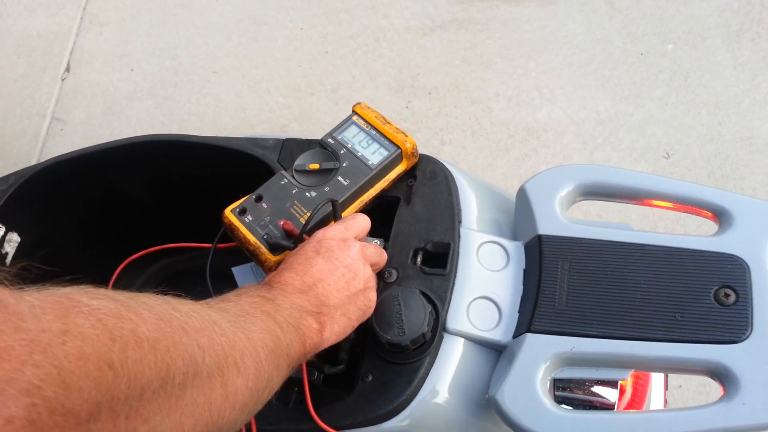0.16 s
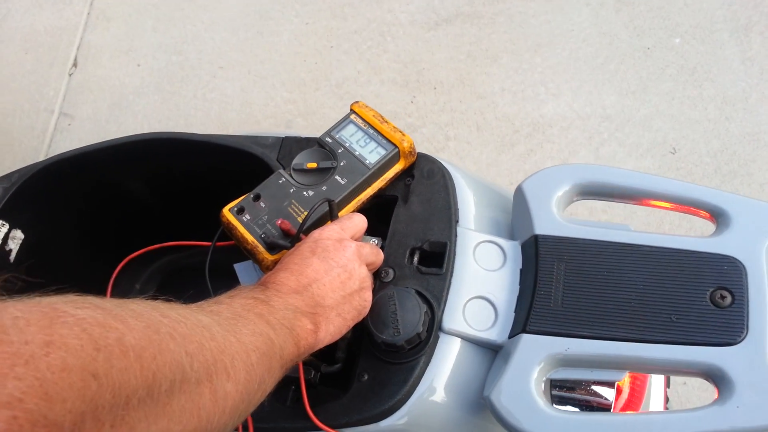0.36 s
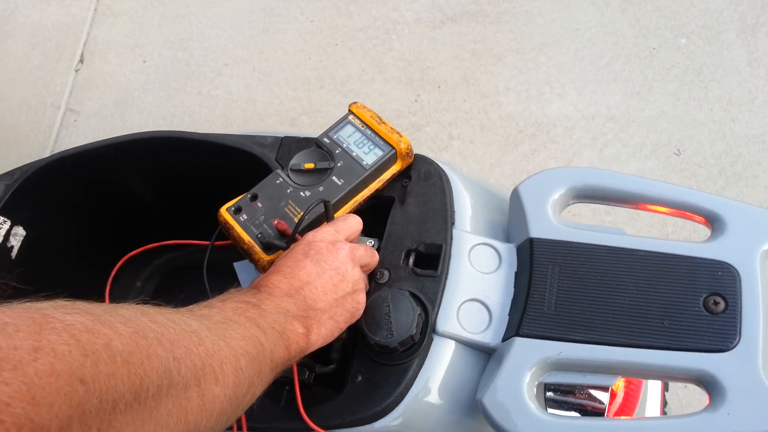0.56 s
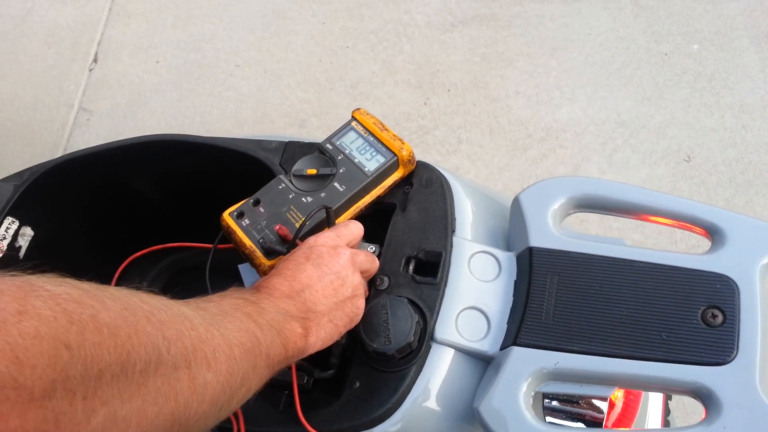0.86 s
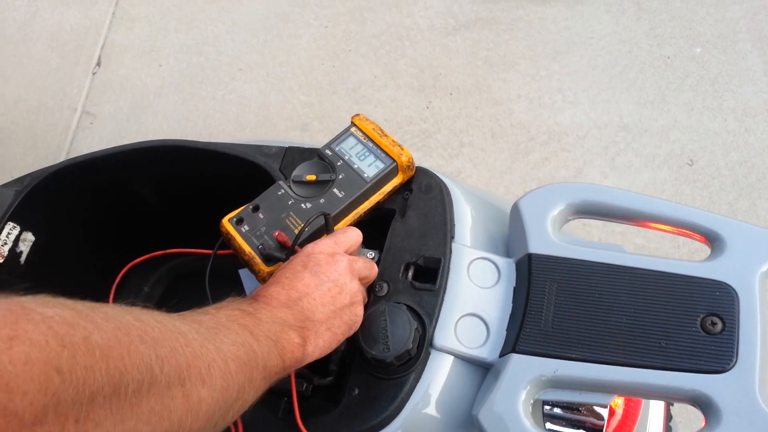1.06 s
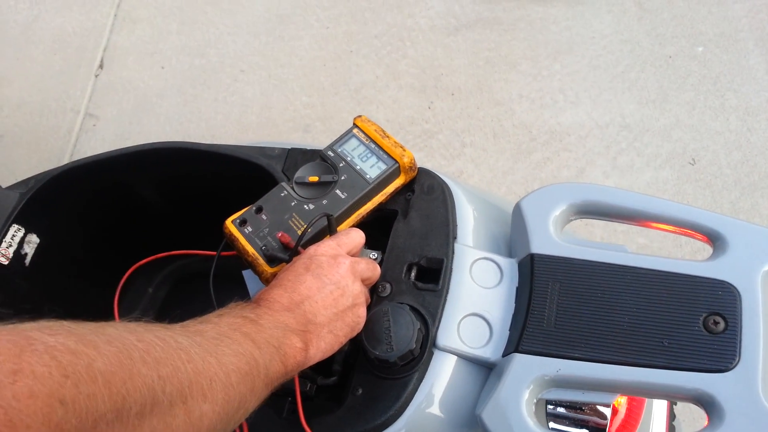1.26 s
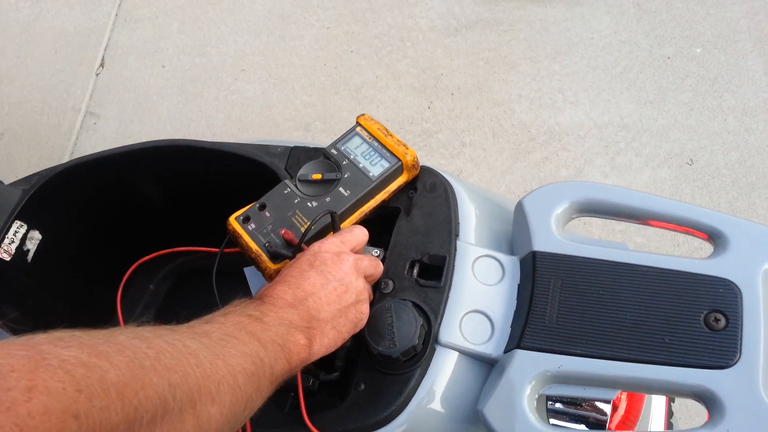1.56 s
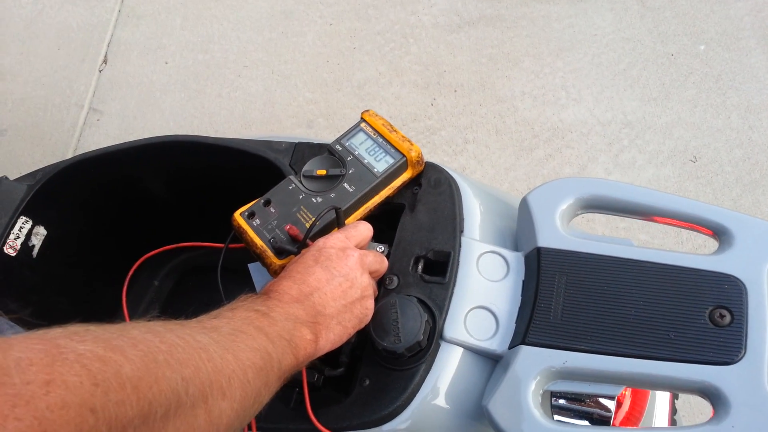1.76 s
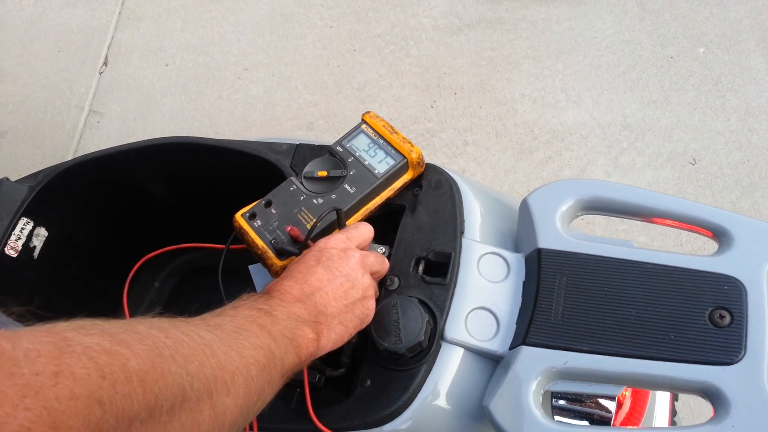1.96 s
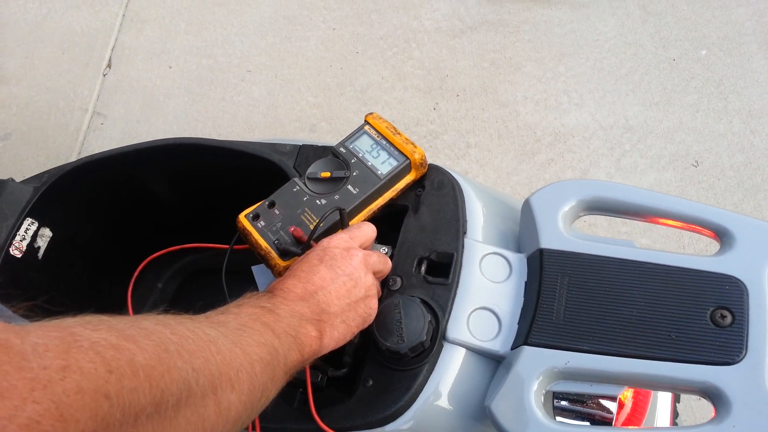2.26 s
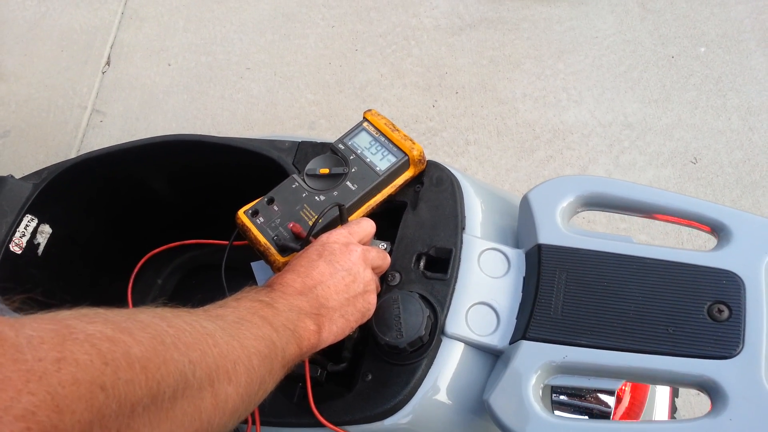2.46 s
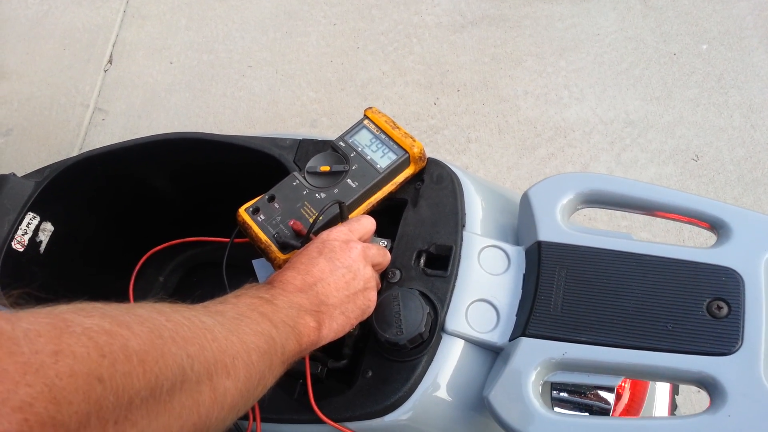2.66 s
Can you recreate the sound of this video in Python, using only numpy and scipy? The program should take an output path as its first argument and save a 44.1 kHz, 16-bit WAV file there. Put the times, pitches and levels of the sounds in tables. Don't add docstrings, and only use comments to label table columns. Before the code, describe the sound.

Scooter engine starting: quiet handling taps, a relay click, rough gear clatter, then a quick puttering idle

```python
import sys
import numpy as np
from scipy import signal
from scipy.io import wavfile
from scipy.ndimage import uniform_filter1d, minimum_filter1d

SR = 44100
rng = np.random.default_rng(int(sys.argv[2]) if len(sys.argv) > 2 else 0)


def how_loud(loudness_db):
    steps = np.asarray(loudness_db, float) / 20
    return 10 ** steps


def put_to_file(sound):
    columns = np.atleast_2d(sound).T
    safe = np.clip(columns, -1, 1)
    whole_steps = np.round(safe * 32767)
    wavfile.write(sys.argv[1], SR, whole_steps.astype(np.int16))


N = 123479
T = np.arange(N) / SR

# t/s, clatter level/dB, fizz against it/dB, low panel against it/dB
DRIVE = [(1.565, -55, -8, -6), (1.59, -33.5, -6, -11), (1.611, -22.5, -2.5, 6), (1.64, -21.5, 0, -4),
         (1.67, -16, -1, 3.5), (1.714, -16, -11, 0.5), (1.75, -23.5, 2, -8), (1.79, -22.5, -0.5, -35),
         (1.823, -20, 2.5, -2.5), (1.87, -19, 2.5, 2.5), (1.92, -17.5, 6, 0.5), (1.96, -19, 1, 0.5),
         (2.05, -19.5, 2.5, -2), (2.25, -16.5, 4, -4.5), (2.5, -20.5, 4, -6), (2.72, -22, 5.5, -0.5),
         (2.8, -24.5, 3, -6)]
MIC_CUT_HZ = 85
STARTER_CUT_HZ, FRAME_CUT_HZ = 150, 340


def evened(x):
    return x / np.sqrt(np.mean(x ** 2) + 1e-20)


def read(points, hz):
    f, value = np.transpose(points)
    return np.interp(np.log(hz + 1), np.log(f + 1), value)


def add(mix, s, sound):
    at = round(s * SR)
    part = mix[max(at, 0):][:len(sound) + min(at, 0)]
    part += sound[max(-at, 0):][:len(part)]


def high_pass(x, hz, order):
    return signal.sosfilt(signal.butter(order, hz, "high", fs=SR, output="sos"), x)


def colour(x, points, rings=(), ring_db=0):
    hz = abs(np.fft.fftfreq(8192, 1 / SR))
    power = how_loud(read(points, hz)) ** 2 if points else 1e-8 + 0 * hz
    for f, width, db in rings:
        power = power + how_loud(db + ring_db) ** 2 / (1 + (2 * (hz - f) / width) ** 2) ** 2
    response = np.exp(np.conj(signal.hilbert(np.log(power) / 2)))
    taps = np.fft.ifft(response).real[:4096]
    return signal.oaconvolve(x, taps)[:len(x)]


def teeth(per_s=2500, spread_db=1.5):
    size = how_loud(spread_db * np.minimum(rng.exponential(1, N), 4))
    size = size * (rng.random(N) < per_s / SR)
    return evened(size * rng.choice([-1., 1.], N)) + 0.83 * rng.standard_normal(N)


def burst(t60, rise_s, length=.3):
    t = np.arange(0, length, 1 / SR)
    return np.minimum(t / rise_s, 1) * how_loud(-60 * t / t60)


def yard():
    # f/Hz, level/dB per Hz
    air = [(60, -47), (120, -11.5), (260, -9.5), (500, -10.5), (2000, -20), (6300, -30), (11000, -29.5),
           (14400, -29.5)]
    # f/Hz, left-right likeness
    likeness = [(60, 1), (370, 0.5), (2270, -0.13), (14000, 0.0)]
    air_db, hum_db = -54.5, -62.5
    frames, hz = N // 256 + 5, np.fft.rfftfreq(1024, 1 / SR)
    a, b, c, d, patches = rng.standard_normal((frames, 513, 5)).T
    patches = evened(uniform_filter1d(uniform_filter1d(patches, 10, 0), 10, 1))
    same, left = read(likeness, hz)[:, None], a + 1j * b
    right = same * left + np.sqrt(1 - same ** 2) * (c + 1j * d)
    lumps_db = 2.7 * patches / (1 + hz[:, None] / 3000)
    z = np.array([left, right]) * how_loud(read(air, hz)[:, None] + lumps_db)
    hiss = evened(signal.istft(z, nperseg=1024, noverlap=768)[1][:, :N])
    hum = evened(colour(rng.standard_normal(N), (), [(258, 18, 0)]))
    return how_loud(air_db) * hiss + how_loud(hum_db) * hum


def cricket():
    # t/s, length/s, level/dB
    chirps = [
        (-.02, .06, -66),
        (1.406, 0.043, -67),
        (1.461, 0.073, -66),
    ]
    tone_hz, throb_hz = 4350, 40
    out = np.zeros(N)
    for at, length, db in chirps:
        t = np.arange(0, length, 1 / SR)
        throb = 1 + 0.6 * np.sin(2 * np.pi * throb_hz * t)
        swell = np.sqrt(np.sin(np.pi * t / length))
        add(out, at, how_loud(db) * swell * throb * np.sin(2 * np.pi * tone_hz * t))
    return out


def touches():
    # t/s, peak level/dB, f/Hz, width/Hz, t60/s
    taps = [(0.0862, -41.5, 3300, 5000, 0.045), (.086, -47.5, 1850, 300, 0.065),
            (.088, -51, 480, 300, 0.098), (.2, -45, 587, 300, 0.058), (.358, -50.5, 594, 604, 0.17),
            (.385, -52, 550, 705, 0.41), (.52, -53.5, 900, 900, 0.12), (.705, -46, 1090, 900, 0.11),
            (1.388, -43.5, 426, 150, 0.16), (1.392, -54, 1080, 500, 0.093),
            (1.525, -55.5, 1510, 2010, 0.32), (1.548, -42, 350, 250, 0.074)]
    out = np.zeros(N)
    for at, db, hz, width, t60 in taps:
        env = burst(t60, 0.0032, 0.18)
        patch = evened(colour(rng.standard_normal(len(env)), (), [(hz, width, 0)]))
        add(out, at, how_loud(db + 0.5) * env * patch)
    return high_pass(out, 2 * MIC_CUT_HZ, order=2)


def jolts():
    rings = [(.654, -42, 285, .022, 0), (.672, -42, 300, .018, 0), (.911, -31, 830, .022, 0),
             (.914, -40, 450, .03, 0), (1.387, -48, 450, .03, -.1), (1.617, -14, 2050, .01, -.1),
             (1.62, -14, 430, .03, -.1), (1.62, -28, 190, .05, 0), (1.66, -30, 240, .07, -.2),
             (1.653, -17, 2000, .008, 0), (1.78, -46, 85, .05, 0), (1.82, -38, 200, .06, -.2),
             (1.83, -11, 440, .03, .3), (1.855, -22, 3790, .03, 0), (1.885, -20, 3020, .03, 0),
             (1.9, -43, 170, .11, 0), (1.975, -20, 9600, .01, 0), (1.977, -18, 1550, .007, 0),
             (1.976, -24, 4850, .008, 0), (1.988, -24, 9550, .028, 0), (1.998, -17, 4650, .008, 0),
             (2.0, -12, 3000, .016, 0), (2.004, -14, 3950, .02, -.02), (2.015, -7, 465, .024, -.12),
             (2.028, -21, 5000, .007, 0), (2.095, -26, 400, .04, 0), (2.18, -20, 3800, .025, 0),
             (2.215, -23, 4950, .014, 0), (2.285, -23, 445, .04, .1), (2.385, -25, 4950, .014, 0),
             (2.38, -25, 470, .045, 0), (2.462, -23, 3470, .015, 0), (2.56, -25, 460, .03, .1),
             (2.64, -23, 490, .03, 0), (2.69, -25, 385, .04, 0)]
    wander_per_s = .4
    out = np.zeros(N)
    waver = evened(uniform_filter1d(rng.standard_normal(N), size=400))
    for at, db, hz, length, glide in rings:
        t = np.arange(0, length, 1 / SR)
        wander = wander_per_s * length * waver[round(at * SR):][:len(t)]
        turns = np.cumsum(hz * (1 + glide * (t / length - .5) + wander)) / SR
        swell = np.sin(np.pi * (t / length) ** 0.66) ** 2
        add(out, at, how_loud(db) * swell * np.sin(2 * np.pi * turns))
    return out


def relay():
    # t/s, peak level/dB
    snaps = [
        (0.909, -25),
    ]
    # f/Hz, level/dB per Hz
    box_spectrum = [(150, -18.5), (600, -7), (2200, -3), (3100, -11.5), (4700, -5.5), (5900, -14.5),
                    (14400, -16.5)]
    # f/Hz, width/Hz, level/dB
    box_rings = [(470, 69, -4), (820, 56, 3), (1960, 290, -9)]
    rise_s = 0.0046
    snap, tail = np.zeros((2, N))
    for at, db in snaps:
        add(snap, at, how_loud(db - 9.5) * burst(0.18, rise_s))
        add(tail, at, how_loud(db - 13.5) * burst(0.47, rise_s, 0.43))
        add(snap, at, how_loud(-39.5) * burst(0.016, .0005))
    box = evened(colour(teeth(), box_spectrum, box_rings, 1.5))
    dull_box = box - high_pass(box, 4000, order=1)
    return snap * box + tail * dull_box


def gear_case(drive, running):
    # f/Hz, level/dB per Hz
    starter = [(88, -57), (150, -3.5), (361, -2.5), (1230, 2.5), (2010, 6), (9830, -23), (14400, -65)]
    # f/Hz, width/Hz, level/dB
    starter_rings = [(616, 90, 2.5), (1010, 150, 4), (1670, 100, 4), (1985, 26, 2), (2244, 30, 2),
                     (2280, 36, 4), (3277, 71, 4.5), (3856, 270, 2.5)]
    # f/Hz, level/dB per Hz
    engine = [(120, -76), (200, -16.5), (402, -5), (932, -5), (1130, -0.5), (3400, -5), (3600, -6),
              (4100, -3.5), (4500, -6.5), (5680, -15), (14400, -49)]
    # f/Hz, width/Hz, level/dB
    engine_rings = [(1160, 60, -2), (1320, 45, -3), (1460, 30, 1), (2010, 45, 1), (2290, 70, -2),
                    (2610, 60, -6), (3020, 45, -3), (3290, 90, -5)]
    ring_db = 3.5
    cranking = high_pass(colour(drive, starter, starter_rings, ring_db), STARTER_CUT_HZ, order=4)
    idling = high_pass(colour(teeth(), engine, engine_rings, ring_db), FRAME_CUT_HZ, order=6)
    return np.sqrt(1 - running) * evened(cranking) + np.sqrt(running) * evened(idling)


def knocks():
    # t/s, peak level/dB, t60/s, brightness 0-1
    blows = [(1.5673, -19, 0.031, 0.27), (1.6035, -9, 0.067, 0.12), (1.617, 6, 0.06, 0.19),
             (1.6544, -1, 0.061, 0.02), (1.671, 1, 0.037, 0.03), (1.699, -20, 0.032, .05),
             (1.817, -9, .04, 0.1), (1.862, -13, 0.027, 0.2), (2.0623, -31, 0.023, 0.1),
             (2.1865, -4.5, .04, 0.08), (2.3583, -4.5, 0.038, 0.07), (2.4883, -12, .03, 0.3),
             (1.8302, 7.5, 0.05, 0.07), (1.88, -16, 0.16, 0.6), (1.9784, -8, 0.2, 0.45),
             (2.0025, -1.5, 0.1, 0.01), (2.0297, 0, 0.048, 0.04), (2.215, -9.5, 0.062, 0.32),
             (2.3024, -8.5, 0.04, 0.25), (2.387, -10.5, 0.13, 0.35), (2.4673, -11.5, 0.04, 0.43),
             (2.547, -13, 0.15, 0.37), (2.623, -1.5, 0.058, 0.19), (2.6974, -7, 0.11, 0.28)]
    dull, bright = np.zeros((2, N))
    for at, db, t60, shine in blows:
        env = burst(t60, 0.0022)
        add(dull, at, how_loud(db - 14.0) * env)
        add(bright, at, how_loud(db - 8) * shine * env)
    return dull, bright


def patchy(x):
    z = signal.stft(x, nperseg=512)[2]
    patches = rng.standard_normal(z.shape[::-1]).T
    patches = evened(uniform_filter1d(uniform_filter1d(patches, 6, 0), 5, 1))
    return evened(signal.istft(z * how_loud(2.2 * patches), nperseg=512)[1][:N])


def airy(x):
    top = signal.sosfiltfilt(signal.butter(8, 12700, "high", fs=SR, output="sos"), x)
    top_share = np.clip((T - 1.81) / 0.52, .15, 1)
    return x - (1 - top_share) * (T > 1.63) * top


def machine():
    # f/Hz, width/Hz, level/dB
    panel_rings = [(399, 41, 4.5), (468, 79, 0.5), (645, 58, 5)]
    # f/Hz, level/dB per Hz
    fizz_spectrum = [(3240, -25.5), (5500, -3.5), (7030, -2.5), (11100, 0.5), (14400, -6.5)]
    # f/Hz, width/Hz, level/dB
    fizz_rings = [(6900, 41, -8), (7770, 62, 5.5), (10100, 120, 4), (10800, 130, 3.5), (11100, 120, 1),
                  (13100, 80, 3), (14350, 200, -5)]
    # f/Hz, width/Hz, level/dB
    fin_rings = [(3785, 50, 0), (3928, 50, -1), (4870, 110, -9)]
    panel_base_db, fizz_base_db, whine_db = -8.5, -14.5, -8
    s, *cols = np.transpose(DRIVE)
    level_db, fizz_db, panel_db = (np.interp(T, s, c) for c in cols)
    running = np.clip((T - 1.79) / .05, .2, 1)
    drive = teeth(1300, 3)
    case = gear_case(drive, running)
    fizz = evened(colour(rng.standard_normal(N) + .5 * drive, fizz_spectrum, fizz_rings))
    panel = evened(high_pass(colour(teeth(), (), panel_rings), FRAME_CUT_HZ, order=4))
    whine = evened(colour(teeth(), (), fin_rings))
    steady = how_loud(level_db) * (T > s[0])
    dull, bright = knocks()
    body = (steady + dull) * patchy(case)
    body = body + steady * how_loud(panel_base_db + panel_db) * panel
    body = body + (steady + dull) * running * how_loud(whine_db) * whine
    hiss = (steady * how_loud(fizz_base_db + fizz_db) + bright) * fizz
    return airy(high_pass(body, STARTER_CUT_HZ, order=4) + hiss)


def exhaust():
    # t/s, peak level/dB
    firings = [
        (2.045, -21.5),
        (2.138, -21),
        (2.235, -20.5),
        (2.322, -22),
        (2.405, -23),
        (2.484, -22),
        (2.563, -24),
        (2.641, -22.5),
        (2.721, -20.5),
    ]
    # f/Hz, level/dB, t60/s
    modes = [(106.5, -1, 0.65), (195, 2, 0.19)]
    rise_s, glide, glide_s, puff_s, rumble_db = 0.0029, 0.24, 0.012, .085, -49
    out, flow, t = np.zeros(N), np.zeros(N), np.arange(0, .3, 1 / SR)
    drift = rng.normal(0, 1, (len(firings), len(modes), 2))
    puff_end = np.clip(4 - 4 * t / puff_s, 0, 1)
    for (at, db), row in zip(firings, drift):
        add(flow, at, how_loud(db + 29.0) * burst(0.63, rise_s))
        for (hz, mode_db, t60), (d, e) in zip(modes, row):
            pitch = hz * (1 + 0.022 * d) * (1 - glide * np.exp(-t / glide_s))
            ring = np.sin(2 * np.pi * np.cumsum(pitch) / SR)
            add(out, at, how_loud(db + mode_db + e - 11.5) * burst(t60, rise_s) * puff_end * ring)
    gas = evened(colour(rng.standard_normal(N), (), [(102, 40, -3.5), (209, 120, 3.5)]))
    return out + how_loud(rumble_db) * flow * gas


def spread(x, other):
    # f/Hz, side against mid/dB
    wide = [(60, -16), (230, -13.5), (920, -4), (3570, -1.5), (14000, 0)]
    # f/Hz, left over right/dB
    lean = [(60, -4), (230, 1.5), (920, 2), (3570, 3), (14000, 5.5)]
    bounce_t60, far_share = 0.043, 0.7
    t = np.arange(0, .08, 1 / SR)
    echoes = rng.choice([-1., 1.], len(t)) * (rng.random(len(t)) < .08)
    echoes = echoes * how_loud(-60 * t / bounce_t60)
    bounce = signal.oaconvolve(x, echoes / np.linalg.norm(echoes))[:N]
    side = colour(np.sqrt(1 - far_share) * bounce + np.sqrt(far_share) * other, wide)
    half = np.array(lean) * [1, .5]
    left = colour(x + side, half.tolist())
    right = colour(x - side, (half * [1, -1]).tolist())
    return np.array([left, right])


def flank():
    return machine() + relay() + touches() + exhaust()


def scene():
    duck_db = -10 * np.clip((T - DRIVE[1][0]) * 20, 0, 1)
    return spread(flank() + jolts() + cricket(), flank()) + yard() * how_loud(duck_db)


def low_pass(x):
    return signal.sosfilt(signal.butter(12, 14560, fs=SR, output="sos"), x)


def record(dry):
    knee = 1.2
    gain = minimum_filter1d(knee / np.maximum(abs(dry).max(0), knee), size=70)
    x = high_pass(dry * uniform_filter1d(gain, size=60), MIC_CUT_HZ, order=2)
    x = signal.lfilter(*signal.iirnotch(13520, 90, SR), x)
    edge = signal.firwin(511, 14800, window=("kaiser", 9), fs=SR)
    x = signal.oaconvolve(x, edge[None], "same")
    return low_pass(x)


dry = scene()
out = record(dry)
put_to_file(out)
```